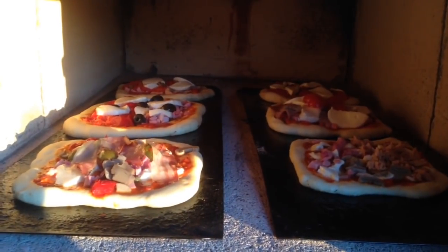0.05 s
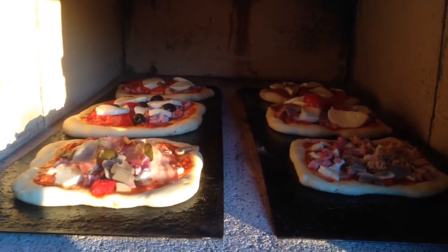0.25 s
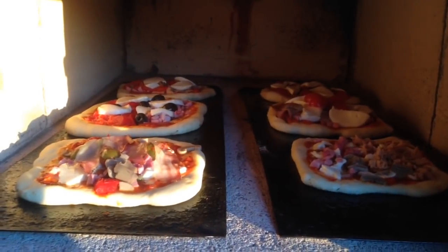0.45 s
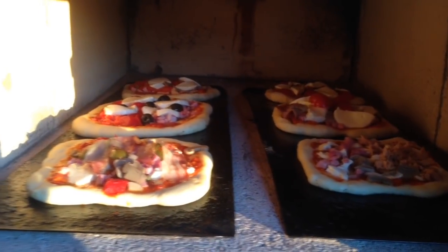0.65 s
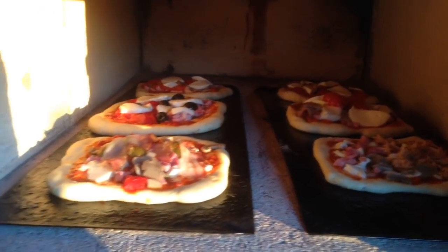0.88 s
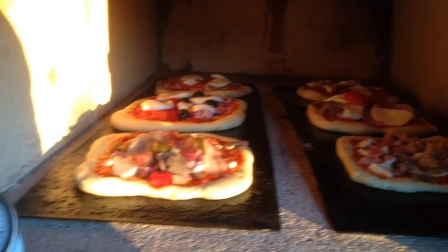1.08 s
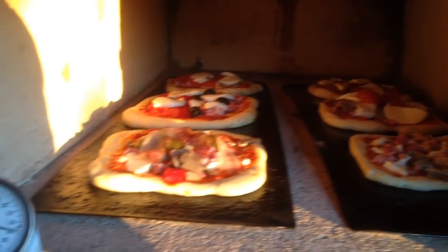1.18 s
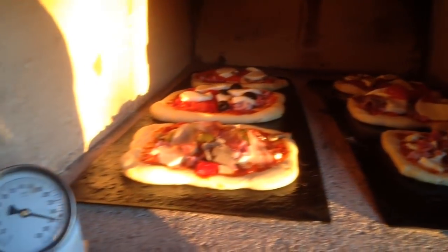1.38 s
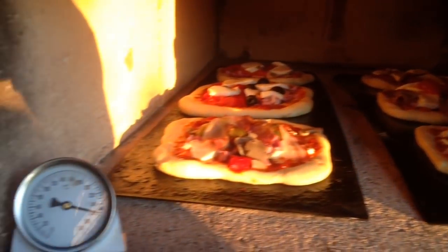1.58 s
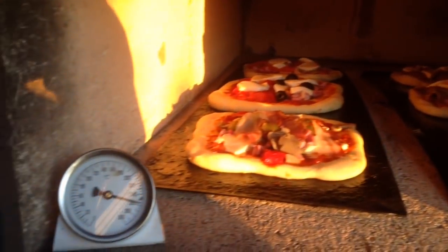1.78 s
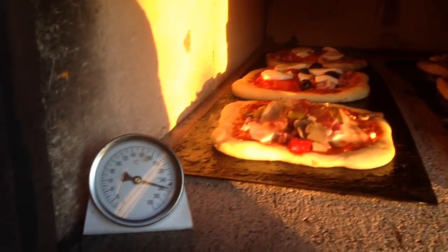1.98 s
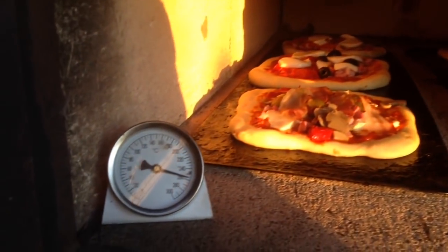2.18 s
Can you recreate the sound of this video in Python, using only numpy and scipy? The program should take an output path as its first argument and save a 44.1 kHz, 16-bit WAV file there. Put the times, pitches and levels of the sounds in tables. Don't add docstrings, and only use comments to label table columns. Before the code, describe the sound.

A wood fire crackles inside a hollow brick oven: two loud pops close together early, weaker snaps around the middle, then sparse small ticks, over a soft low flame roar and fine hiss, heard close by a phone.

```python
import sys
import numpy as np
from scipy import signal
from scipy.fft import rfft, irfft
from scipy.io import wavfile
from scipy.ndimage import uniform_filter1d

SR = 44100
rng = np.random.default_rng(int(sys.argv[2]) if len(sys.argv) > 2 else 0)


def makeup_ratio(level_db):
    decades = np.asarray(level_db, float) / 20
    return 10 ** decades


def master(y):
    cut = np.clip(np.atleast_2d(y).T, -1, 1)
    pcm = np.round(cut * 32767)
    wavfile.write(sys.argv[1], SR, pcm.astype(np.int16))


N = 99225

# start in seconds, peak level in dB, crack over ring in dB,
# crack centre in Hz, crack width in octaves.
SPLITS = [
    (0.1702, -41.5, 2, 5640, 1.8),
    (0.2766, -18.5, -1.5, 8430, 1.06),
    (.3903, -15, -12, 10100, 0.63),
    (0.8766, -31, -14.5, 12500, 0.54),
    (.993, -23.5, -5.5, 6600, 0.38),
    (1.1805, -27.5, -11, 6300, 0.51),
]
STRUCK_BODY = (0, 0, 1, 0, 2, 3)
# start in seconds, peak level in dB, centre in Hz, width in octaves.
EMBERS = [(0.1269, -38, 4170, 2.2), (0.2913, -51, 8500, 1.3), (.3653, -50, 6700, 1),
          (.466, -36.5, 6600, 1.4), (.5317, -47, 3460, 2.4), (0.548, -40.5, 7300, 1.3),
          (0.5563, -32.5, 7100, 4.7), (0.718, -51, 2180, 1.9), (0.822, -48, 4000, 2.6),
          (0.9288, -51, 6400, 1.7), (1.0895, -45, 5870, 1.5), (1.1185, -43, 10500, 1.2),
          (1.2163, -45.5, 6600, 1.6), (1.3509, -38, 6500, 1.15), (1.4074, -53, 7560, 0.67),
          (1.485, -36, 3020, 3.8), (1.5224, -41.5, 9900, 1.7), (1.5428, -47, 6900, 2.2),
          (1.6884, -51.5, 6470, 0.86), (1.8144, -50.5, 2800, 2.3), (1.984, -38, 7140, 0.82),
          (2.1458, -48.5, 5900, 1.2)]

# frequency in Hz, level in dB, 60 dB decay time in seconds.
TRAY_MODES = [(390, -12, 0.013), (823, -11, 0.035), (1510, -11, 0.03), (2174, -5.5, 0.048),
              (2323, 5, 0.026), (3203, -5.5, 0.027), (3820, -5.5, 0.021), (5640, -2, 0.019),
              (6600, -3.5, 0.011)]
LOG_MODES = [(281, -11, 0.079), (580, -5.5, 0.032), (915, -9, 0.029), (1106, 1, 0.036), (1452, 4, 0.018),
             (1732, 4.5, 0.014), (2088, 2.5, 0.015), (2620, -11.5, 0.044), (3120, -6.5, 0.024),
             (3296, -9, 0.018), (4000, -14, 0.026), (5040, -0.5, 0.0086)]
STUMP_MODES = [(153, 0, 0.066), (200, -4.5, 0.057), (276, 0.5, 0.045), (374, -3, 0.055), (544, 3.5, 0.044),
               (740, -11, 0.064), (1200, -14, 0.0081), (2530, -9.5, 0.0093), (3950, -5.5, 0.0077),
               (10500, -1, 0.0054)]
TWIG_MODES = [(626, -13.5, 0.011), (1210, -18, 0.024), (1408, -7.5, 0.058), (1770, -17, 0.016),
              (2154, -7.5, 0.036), (2765, 3.5, 0.0074), (3190, -5, 0.011), (4040, -1.5, 0.013),
              (5040, -8, 0.013), (5680, -0.5, 0.0072)]
BODIES = (TRAY_MODES, LOG_MODES, STUMP_MODES, TWIG_MODES)

# frequency in Hz, density in dB per Hz.
ROAR_SPECTRUM = [(12, -50), (20, -20.5), (65, -1), (166, -13.5), (265, -11.5), (317, -19), (507, -23.5),
                 (1500, -38.5), (1950, -82), (3300, -120)]
# centre in Hz, half width in Hz, level over the roar in dB.
OVEN_MODES = [(57.4, 11.4, 4), (97.3, 10.2, 6.5), (143.6, 10.7, 7.5), (269.3, 30, 7), (278.7, 7.3, 7.5),
              (393, 49, 2)]
# time in seconds, roar level in dB.
ROAR_LEVEL = [(0, -48.5), (.1, -54), (.2, -49), (.27, -52.5), (.35, -49.5), (.47, -49.5), (.62, -49.5),
              (.75, -52.5), (1.02, -48.5), (1.15, -51), (1.28, -51.5), (1.38, -50), (1.52, -50),
              (1.62, -51), (1.85, -49.5), (1.96, -47.5), (2.05, -51), (2.25, -50.5)]
# frequency in Hz, density in dB per Hz.
HISS_SPECTRUM = [(300, -7.5), (1500, -3), (2600, -5), (3500, -2.5), (6000, -3), (10000, -4.5), (15000, -5)]

SPLIT_RISE_S, SPLIT_T60_S, CRACK_T60_S, TICK_T60_S = 0.0003, 0.005, 0.011, 0.010
SNAP_DB, SNAP_T60_S, STRIKE_S = -13, 0.009, 0.0007
SPARKS_PER_S, SPARK_DB, SPARK_SPREAD_DB = 40, -64, 2
OVEN_T60_S, OVEN_DB = 0.084, -19.5
ECHO_S, ECHO_DB = 0.0033, -15
FLICKER_DB, FLICKER_HZ = 3.5, 10.93
SAP_HZ, SAP_DB, SAP_START_S, SAP_RISE_S = 2150, -62, 2.2, 0.051
WHINE_HZ, WHINE_DB = 15000, -84
HISS_DB = -62
SIDE_DB = -27
LOW_CUT_HZ, TOP_HZ = 23, 15200


def unit(x):
    return x / np.abs(x).max()


def add(out, x, start_s, peak_db):
    i = int(start_s * SR)
    x = x[:N - i]
    out[i:i + len(x)] += x * makeup_ratio(peak_db) / np.abs(x).max()


def band(x, hz, octaves):
    edges_hz = hz * 2.0 ** (np.array([-0.5, 0.5]) * max(octaves, 0.1))
    edges_hz = np.clip(edges_hz, [20, 30], [0.44 * SR, 0.45 * SR])
    return signal.sosfilt(signal.butter(2, edges_hz, "bandpass", fs=SR, output="sos"), x)


def ring(x, hz, t60_s):
    pole = np.exp(2j * np.pi * hz / SR - np.log(1000) / (t60_s * SR))
    return signal.lfilter([1], [1, -pole], x).imag


def burst(noise, t60_s):
    t = np.arange(len(noise)) / SR
    rise = 1 - np.exp(-t / SPLIT_RISE_S)
    tear = makeup_ratio(-60 * t / t60_s)
    walls = makeup_ratio(OVEN_DB - 60 * t / OVEN_T60_S)
    return noise * rise * (tear + walls)


def walk(rate_hz):
    hold = int(SR / rate_hz)
    steps = np.repeat(rng.standard_normal(200), hold)[:N]
    x = uniform_filter1d(uniform_filter1d(steps, hold), hold)
    return 0.77 * np.pad(x, (0, N - len(x)), mode="edge")


def colour(points):
    f = np.maximum(np.fft.rfftfreq(N, 1 / SR), 1)
    hz, db = np.array(points).T
    return f, makeup_ratio(np.interp(np.log(f), np.log(hz), db))


def pops():
    out = np.zeros(N)
    noises = rng.standard_normal((len(SPLITS), 2, 6000))
    for (start_s, peak_db, crack_db, hz, octaves), noise, index in zip(SPLITS, noises, STRUCK_BODY):
        push = 0.3 * burst(noise[0], SPLIT_T60_S)
        push[int(STRIKE_S * SR)] -= 3
        body = 0
        for mode_hz, mode_db, t60_s in BODIES[index]:
            body = body + makeup_ratio(mode_db) * unit(ring(band(push, mode_hz, 2.4), mode_hz, t60_s))
        crack = band(band(burst(noise[1], CRACK_T60_S), hz, octaves), hz, octaves)
        snap = band(burst(noise[0][::-1], SNAP_T60_S), 2250, 3.2)
        pop = unit(body) + makeup_ratio(crack_db) * unit(crack) + makeup_ratio(SNAP_DB) * unit(snap)
        add(out, pop, start_s, peak_db)
    return out


def ticks():
    out = np.zeros(N)
    noises = rng.standard_normal((len(EMBERS), 3000))
    for (start_s, peak_db, hz, octaves), noise in zip(EMBERS, noises):
        add(out, band(burst(noise, TICK_T60_S), hz, octaves), start_s, peak_db)
    return out


def sparks():
    out = np.zeros(N)
    chances = rng.random((400, 3))
    noises = rng.standard_normal((400, 600))
    starts_s = np.cumsum(-np.log(1 - chances[:, 0])) / SPARKS_PER_S
    starts_s = starts_s[starts_s < N / SR - 0.02]
    for start_s, chance, noise in zip(starts_s, chances, noises):
        hz = 1500 * 8 ** chance[1]
        peak_db = SPARK_DB - SPARK_SPREAD_DB * np.log(1 - chance[2])
        add(out, band(burst(noise, 0.03), hz, 1.96), start_s, peak_db)
    return out


def oven_echo(x):
    lag = int(ECHO_S * SR)
    feedback = min(makeup_ratio(ECHO_DB), 0.8)
    return signal.lfilter([1], np.r_[1, np.zeros(lag - 1), -feedback], x)


def flames():
    f, gain = colour(ROAR_SPECTRUM + [(6000, -62)])
    for hz, width_hz, db in OVEN_MODES:
        gain = gain * makeup_ratio(db / (1 + ((f - hz) / width_hz) ** 2))
    spectrum = rfft(rng.standard_normal(N)) * gain
    shared = walk(FLICKER_HZ)
    roar = 0
    for octave in np.arange(4, 13.0):
        weight = np.clip(1 - np.abs(np.log2(f) - octave), 0, 1)
        part = irfft(spectrum * weight, N)
        roar = roar + part * makeup_ratio(FLICKER_DB * (0.2 * shared + walk(FLICKER_HZ)))
    surge_db = np.interp(np.arange(N) / SR, *np.array(ROAR_LEVEL).T)
    return roar / roar.std() * makeup_ratio(surge_db)


def sap_whistle():
    t = np.arange(N) / SR
    rise = np.clip((t - SAP_START_S) / SAP_RISE_S, 0, 1)
    return makeup_ratio(SAP_DB) * rise * np.sin(2 * np.pi * SAP_HZ * t)


def hiss():
    x = irfft(rfft(rng.standard_normal(N)) * colour(HISS_SPECTRUM)[1], N)
    return x * makeup_ratio(HISS_DB + 0.36 * walk(18)) / x.std()


def electronics_whine():
    return makeup_ratio(WHINE_DB) * np.sin(2 * np.pi * WHINE_HZ * np.arange(N) / SR)


def scene():
    crackle = oven_echo(pops() + ticks() + sparks())
    mono = crackle + flames() + sap_whistle() + hiss() + electronics_whine()
    treble = band(band(crackle, 8500, 1.5), 8500, 1.5)
    side = makeup_ratio(SIDE_DB) * np.roll(treble, 9)
    return np.array([mono + side, mono - side])


def low_pass(x):
    return signal.sosfilt(signal.butter(12, 16400, fs=SR, output="sos"), x)


def record(dry):
    top_cut = signal.ellip(7, 0.5, 36, TOP_HZ, fs=SR, output="sos")
    low_cut = signal.butter(2, LOW_CUT_HZ, "highpass", fs=SR, output="sos")
    mix = signal.sosfilt(low_cut, signal.sosfilt(top_cut, dry))
    return low_pass(mix)


dry = scene()
out = record(dry)
master(out)
```